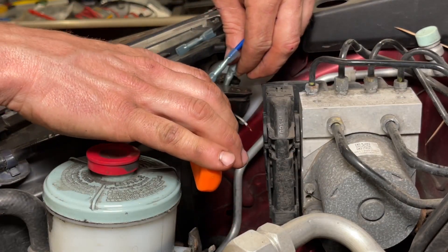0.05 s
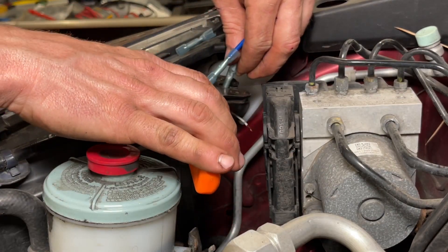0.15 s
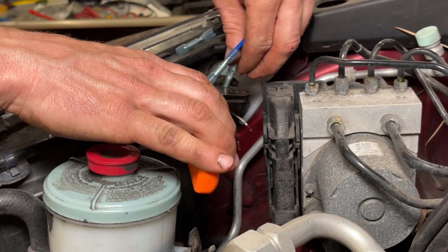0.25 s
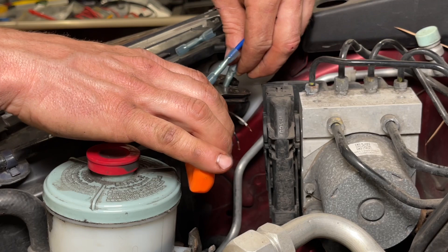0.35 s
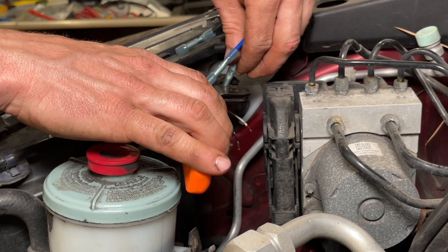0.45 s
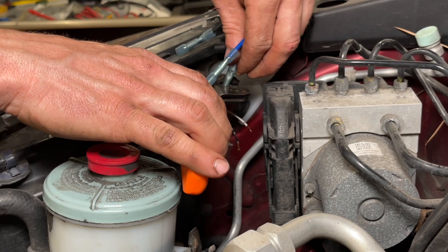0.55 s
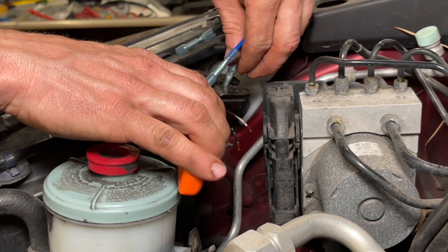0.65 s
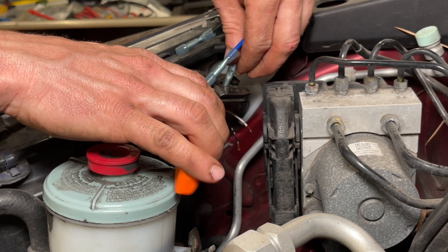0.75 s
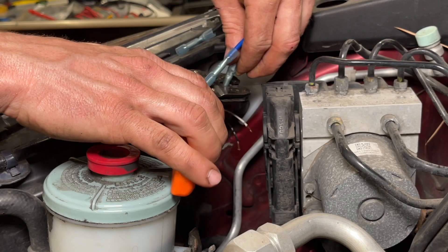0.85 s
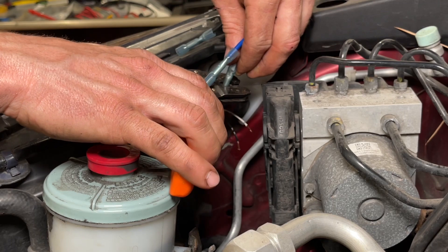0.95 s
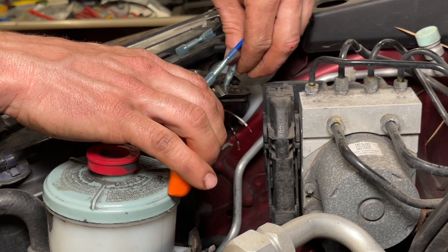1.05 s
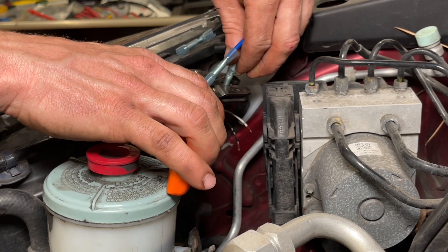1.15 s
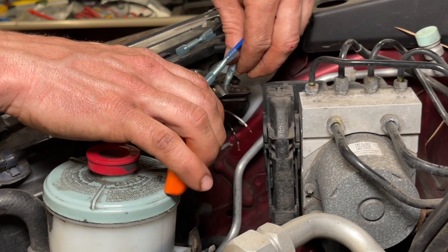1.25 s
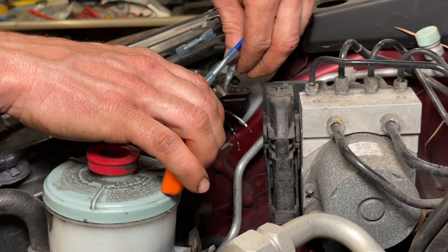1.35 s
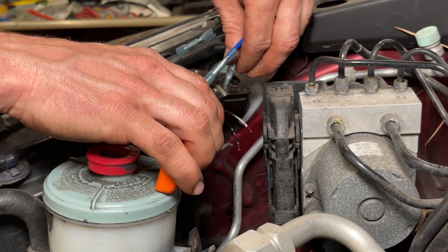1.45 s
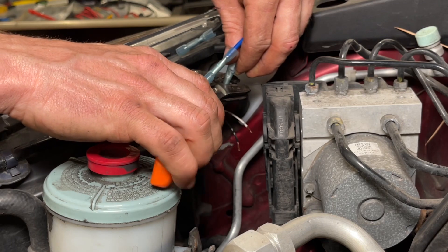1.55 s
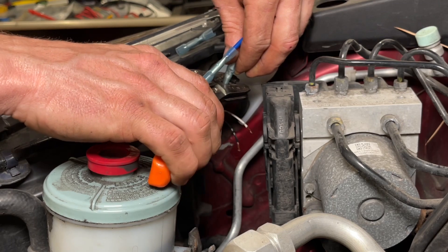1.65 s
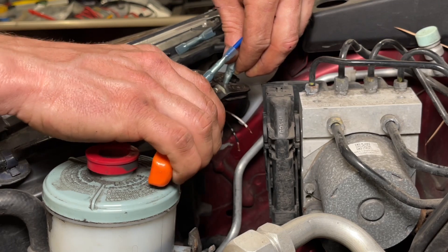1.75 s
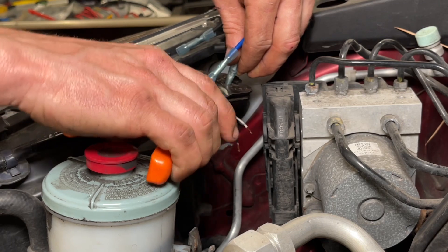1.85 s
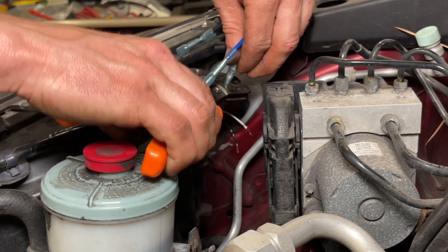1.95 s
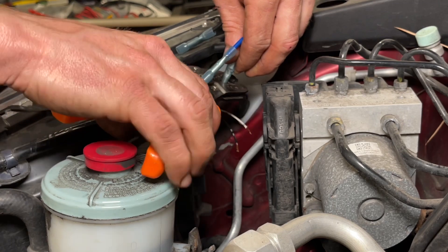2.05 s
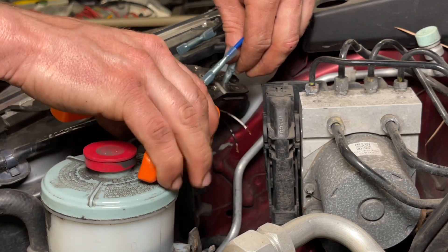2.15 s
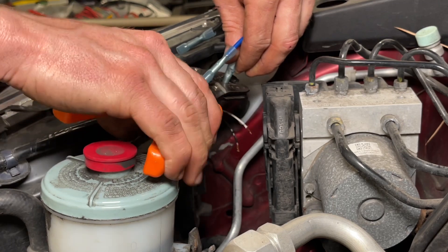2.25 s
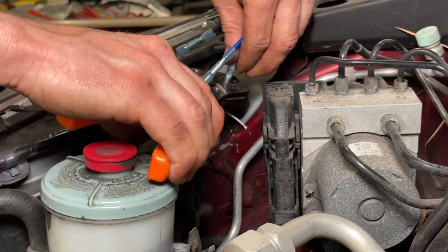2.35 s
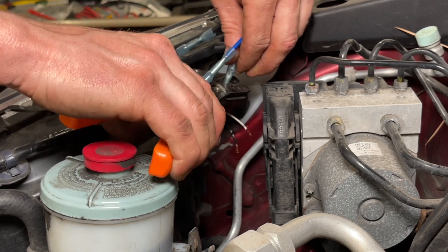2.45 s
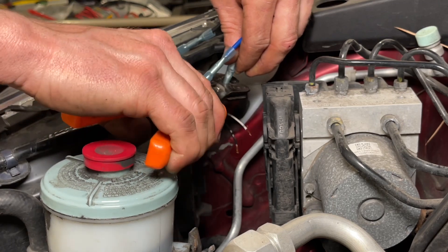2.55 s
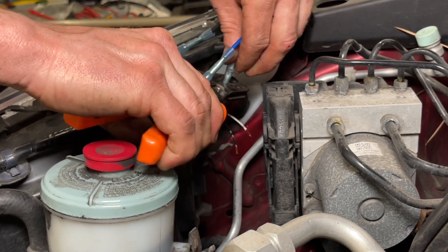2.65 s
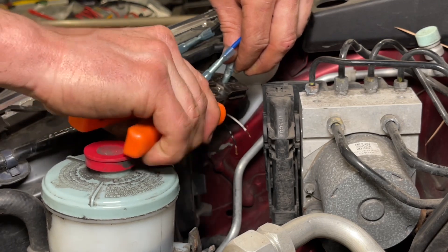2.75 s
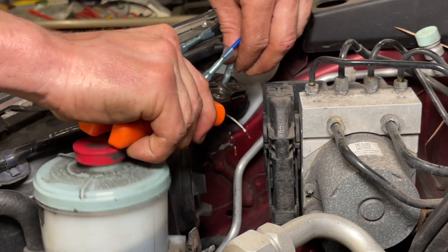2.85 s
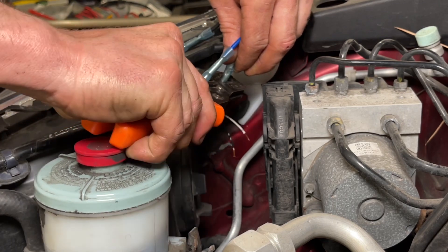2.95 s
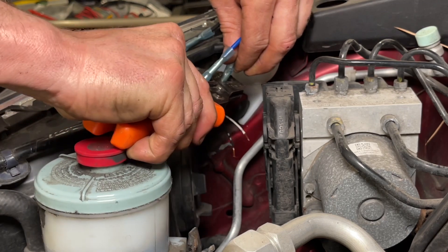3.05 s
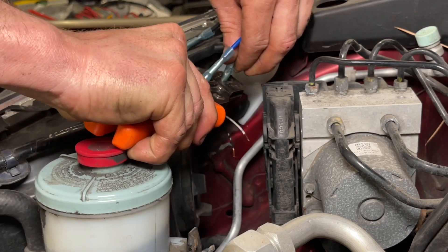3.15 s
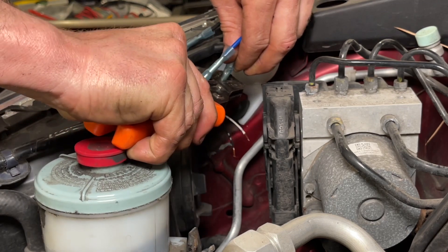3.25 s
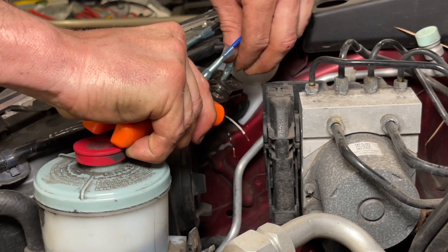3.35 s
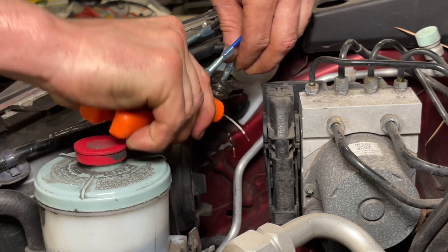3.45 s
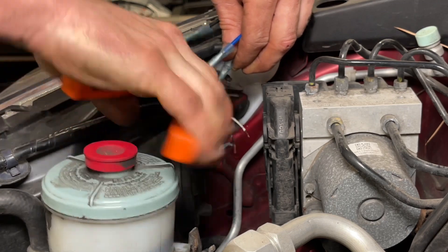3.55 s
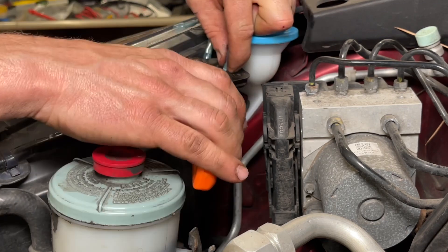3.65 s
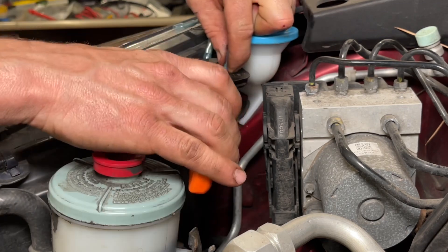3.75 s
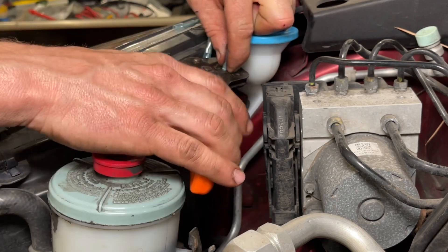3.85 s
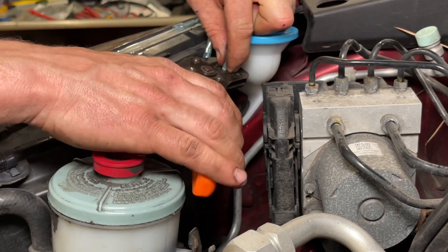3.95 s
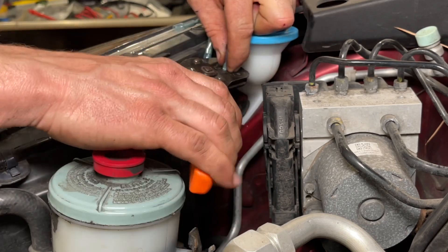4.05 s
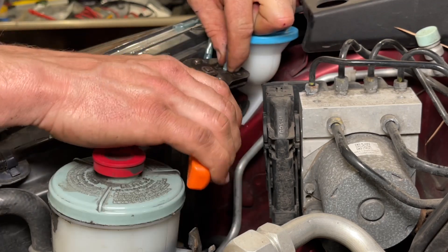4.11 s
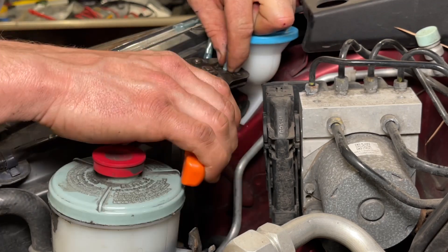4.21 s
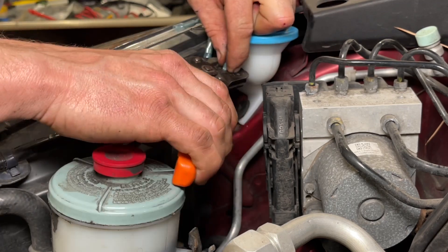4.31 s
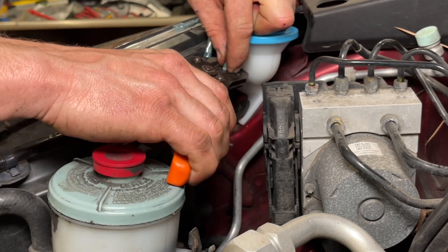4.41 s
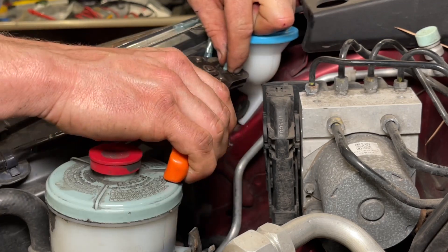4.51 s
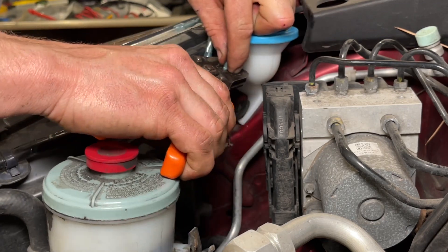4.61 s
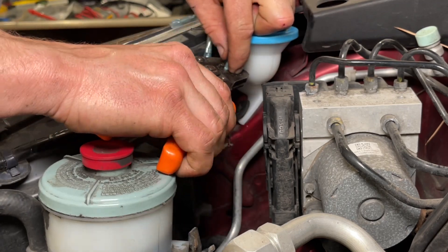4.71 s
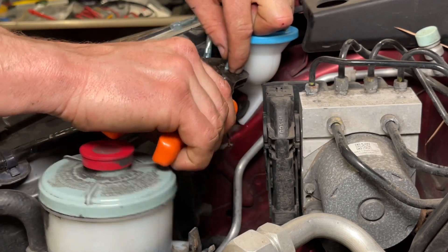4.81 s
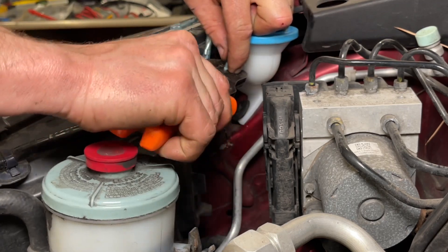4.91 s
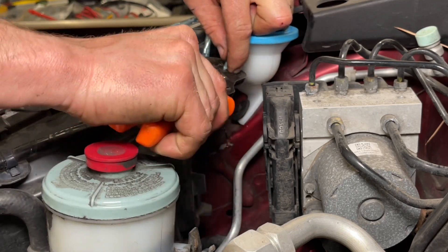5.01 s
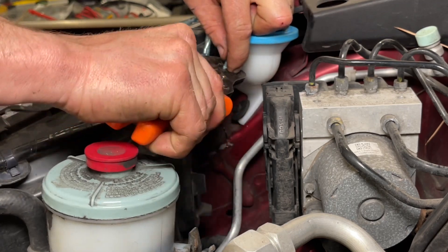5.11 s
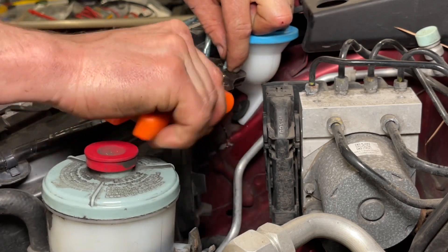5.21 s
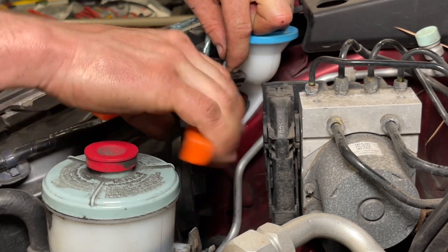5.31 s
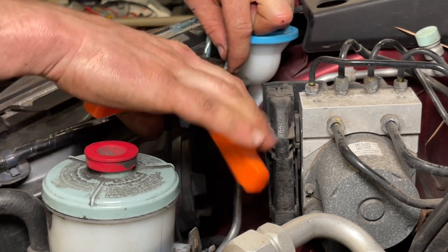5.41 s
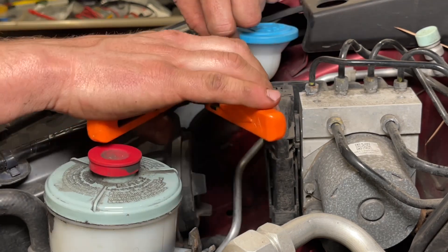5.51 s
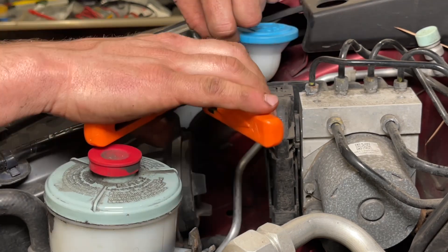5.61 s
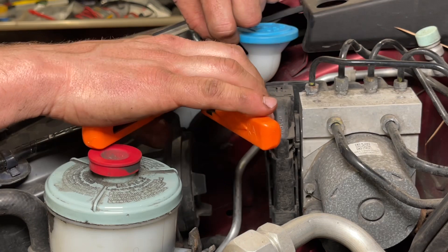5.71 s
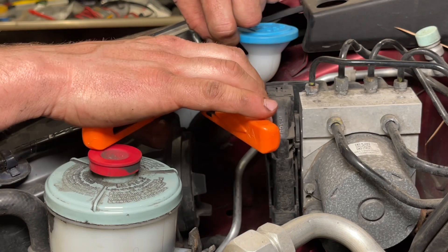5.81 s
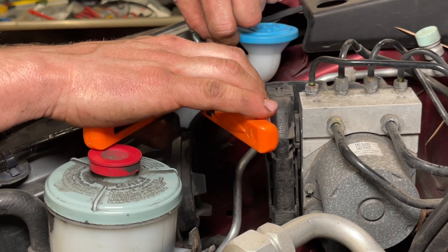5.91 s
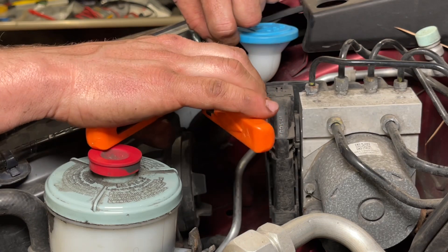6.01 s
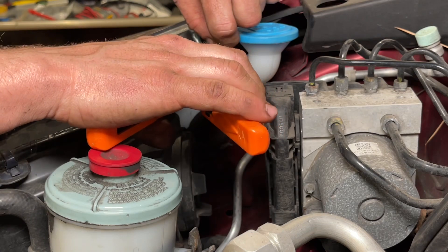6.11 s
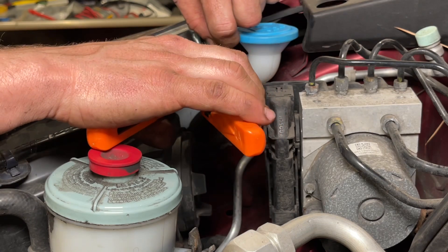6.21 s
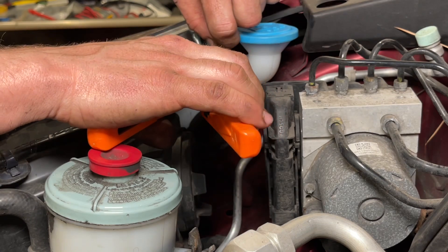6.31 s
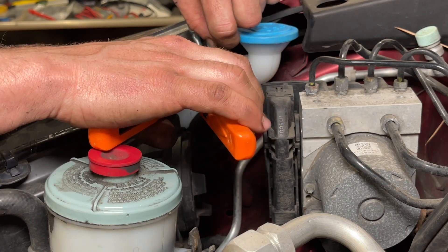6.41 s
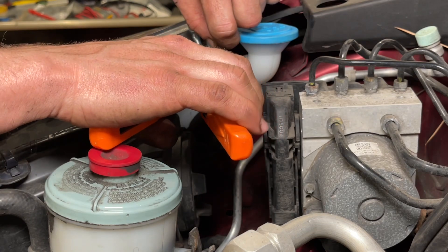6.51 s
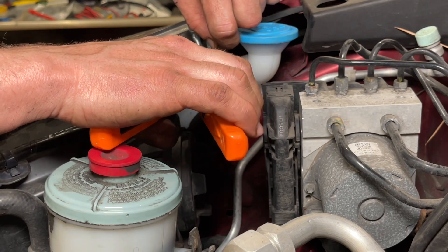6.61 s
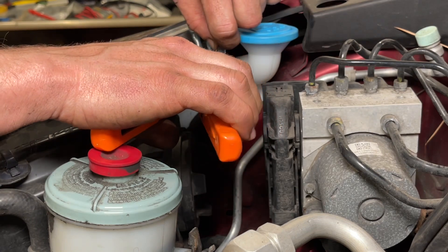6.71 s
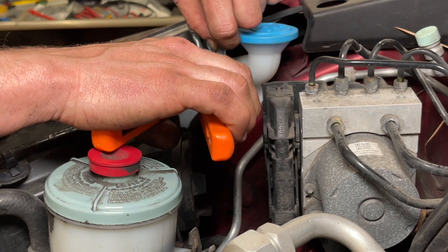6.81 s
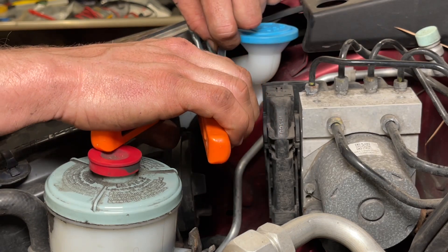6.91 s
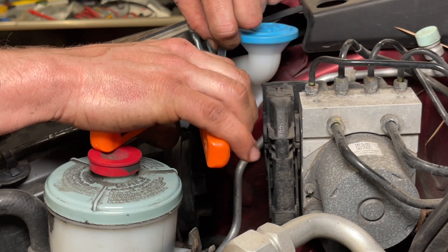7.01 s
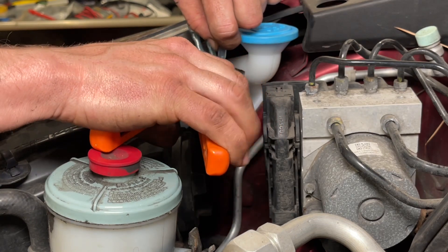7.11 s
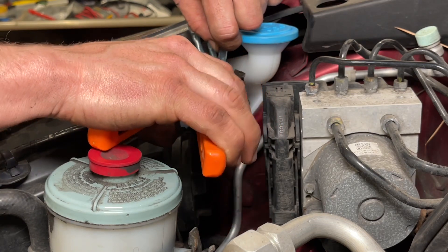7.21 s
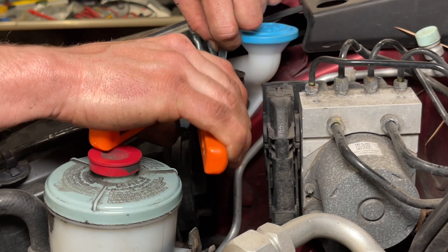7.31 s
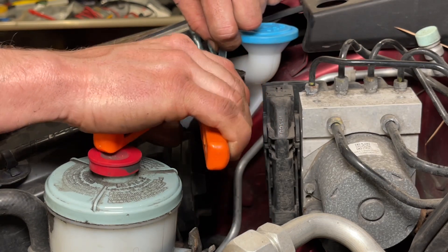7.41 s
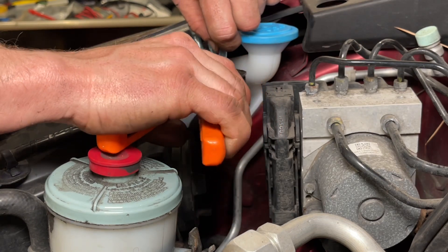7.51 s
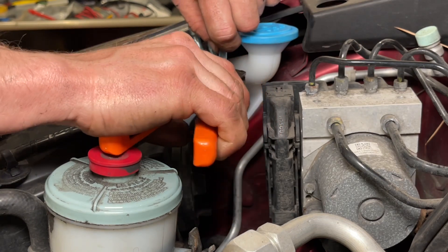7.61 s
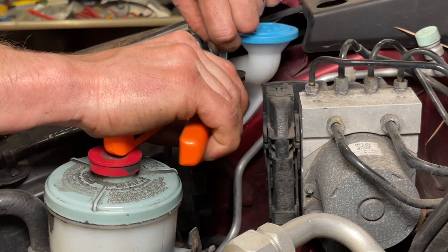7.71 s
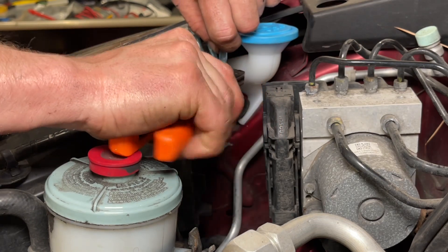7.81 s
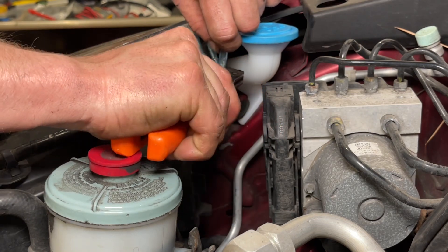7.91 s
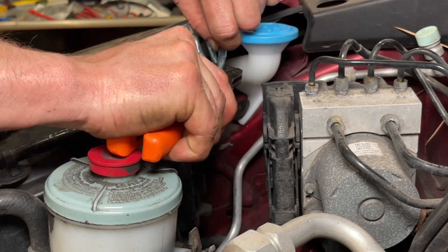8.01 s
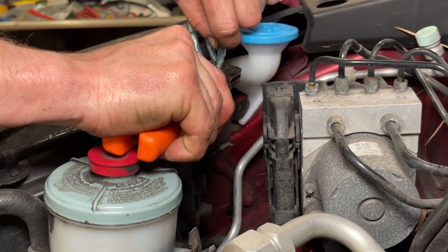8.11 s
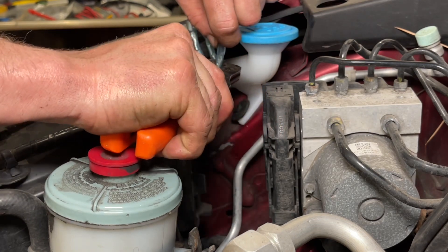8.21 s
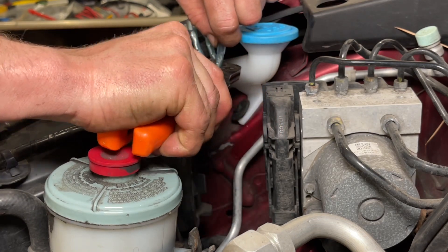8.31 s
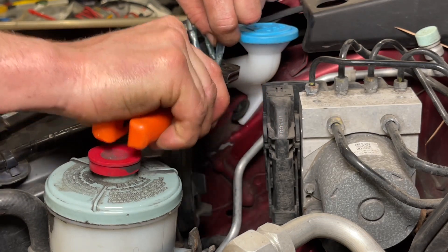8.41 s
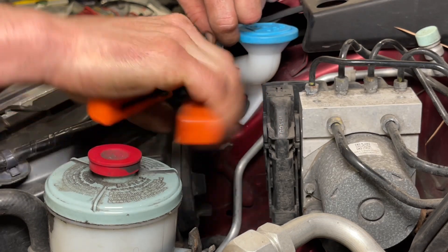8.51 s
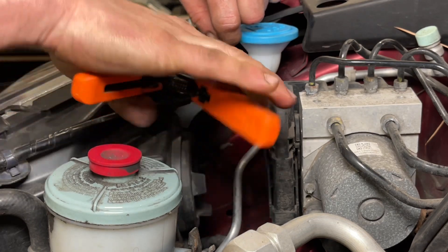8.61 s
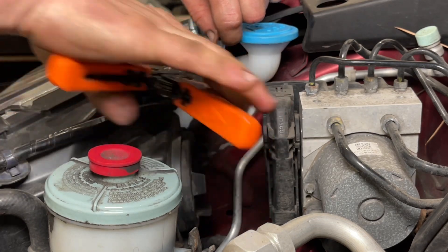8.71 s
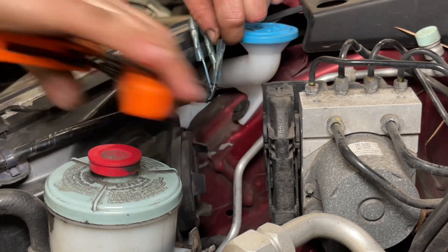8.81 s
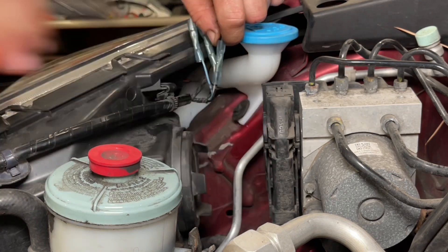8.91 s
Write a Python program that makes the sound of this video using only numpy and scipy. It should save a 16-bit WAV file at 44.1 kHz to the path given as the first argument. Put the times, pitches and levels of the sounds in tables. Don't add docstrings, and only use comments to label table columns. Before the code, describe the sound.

Three squeezes of a steel ratchet crimper, heard close and dry with a short engine bay echo and a faint garage tail. Crisp uneven clicks lead to a firm bite, then teeth purr back in a quick clatter. Small ticks, dull handle rubbing, plastic tank thumps and a tiny spring squeak fill in. Far traffic rumbles softly, cutting out momentarily at two scene changes; a barely audible brake squeal comes late.

```python
import sys
import numpy as np
from scipy import signal
from scipy.fft import rfft, irfft, next_fast_len
from scipy.io import wavfile
from scipy.ndimage import uniform_filter1d, map_coordinates

SR = 44100
rng = np.random.default_rng(int(sys.argv[2]) if len(sys.argv) > 2 else 0)


def field_ratio(decibels):
    return 10 ** (np.asarray(decibels, dtype=float) / 20)


def master_out(mix):
    frames = np.transpose(np.atleast_2d(mix))
    ceiling = np.clip(frames, -1, 1)
    pcm = np.round(ceiling * 32767).astype(np.int16)
    wavfile.write(sys.argv[1], SR, pcm)


N = 395047
TIME = np.arange(N) / SR

# centre in Hz, width in Hz, level in dB.
PAWL_MODES = [(4600, 520, -7.5), (5993, 1400, -4), (7400, 900, -2.5), (8713, 700, -1.5)]
PAWL_TIP_MODES = [(9300, 1500, -2), (10400, 1000, 3), (12300, 900, -8.5)]
FRAME_MODES = [(1600, 370, -8.5), (2030, 280, -1.5), (2684, 814, -2.5), (3600, 1400, -2), (4500, 500, -1)]
JAW_MODES = [(1700, 350, -4), (1208, 200, 1.5), (1220, 25, 4.5)]
# start in seconds, level in dB, pitch in
# Hz, 60 dB decay in seconds.
PANELS = [(2.487, -52.5, 2740, 0.23), (2.53, -59.5, 2720, .3), (2.61, -49, 2720, 0.2),
          (2.826, -49, 1223, 0.44), (4.881, -47.5, 1222, 0.53), (2.826, -61, 4530, 0.48),
          (4.893, -61, 4600, .5), (6.814, -55.5, 4284, 0.4), (7.213, -57.5, 1220, .35),
          (1.6028, -17, 2900, 0.02), (1.606, -24, 3080, .022), (1.407, -68, 6520, .3),
          (1.407, -70, 6200, .2), (1.407, -71, 5850, .2), (1.407, -66, 8200, .12), (1.407, -66, 3100, .1),
          (1.407, -70, 4000, .12), (1.903, -66, 5500, .016), (1.943, -66, 5600, .018),
          (1.953, -69, 4200, .03), (1.823, -63, 4600, .016), (7.596, -33, 1620, .022),
          (7.679, -35, 1700, .022), (7.729, -34, 1680, .022), (7.811, -33, 1700, .022),
          (6.814, -26, 4230, .025), (1.604, -48, 8000, .2), (6.814, -52, 3327, .15), (6.814, -59, 4130, .5),
          (6.814, -58, 4400, .3), (6.814, -56, 8540, .25), (6.814, -60, 8060, .4), (6.814, -60, 7560, .35),
          (1.604, -50, 3332, .14), (1.604, -60, 4124, .5), (1.604, -57, 6320, .25), (7.86, -60, 4377, .35),
          (7.86, -63, 4151, .42), (2.695, -56, 4600, .25), (4.893, -62, 4727, .8), (7.86, -55, 1220, 0.43)]


def crimper():
    s, db, frame_db, jaw_db, t60, link_hz, rise = contacts()
    dragged = rise > rise.min()
    heavy = (frame_db > -9.9) & ~dragged
    pawl_db = db - 7 + 2.5 * (dragged + 1.6 * heavy)
    tip_db = db - 5 - 3 * (dragged | heavy)
    edge_db = db - 9.5 + 6.5 * dragged - 6 * heavy
    pawl = steel(PAWL_MODES, s, pawl_db, t60, rise, bay_db=-21.5, garage_db=-32.5, garage_t60=0.5)
    tip = steel(PAWL_TIP_MODES, s, tip_db, 1.1 * t60, rise, bay_db=-22.5, garage_db=-31.5, garage_t60=0.3)
    edge = filtered(strokes(s, edge_db, 0.013, rise) * rng.standard_normal(N), body([(15000, 2900, 0)]))
    frame = steel(FRAME_MODES, s, db + frame_db + 0.5, t60, rise, bay_db=-14, garage_db=-30, garage_t60=0.52)
    jaw = steel(JAW_MODES, s, db + jaw_db - 8, 0.6 * t60, rise, bay_db=-6, garage_db=-25, garage_t60=0.52)
    rings = ring(s, db + jaw_db + 6.5, 1175, 0.029, beat=0) + plates(s, db - 26)
    for offset_db, detune in [(1.2, 0), (-3, 0.09)]:
        hz = link_hz * (1 + detune * rng.uniform(-1, 1, len(s)))
        rings = rings + ring(s + 0.0006, db + frame_db + offset_db, hz, 0.021, beat=0)
    small = filtered(pawl + tip + frame, lambda hz: (1j * hz / (1j * hz + 1100)) ** 2)
    panels = ring(*np.transpose(PANELS), beat=0.45)
    return small + edge + jaw + rings + panels


# start in seconds, peak in dB, frame in dB re pawl, ringing link in Hz.
TEETH = [(1.5781, -25.5, -19, 2920), (2.4848, -12, -17, 2830), (2.5283, -17.5, -18, 4070),
         (2.608, -7, -19, 2830), (2.6872, -18.5, -21, 4600), (2.6936, -10, -17.5, 4440),
         (2.7373, -8.5, -17.5, 4530), (4.2705, -10, -21.5, 4640), (4.3257, -19.5, -20.5, 4660),
         (4.4618, -10, -17, 3970), (4.5149, -20, -19.5, 4000), (4.6304, -12, -17, 4880),
         (4.7281, -13, -16.5, 4900), (7.4714, -12, -19, 3110), (7.5305, -15.5, -19, 4800),
         (7.5949, -9, -20, 4500), (7.624, -17.5, -17, 4650), (7.6783, -12, -15, 4600),
         (7.7286, -12, -16, 4480)]
# start in seconds, peak in
# dB, frame in dB re pawl, jaw in dB re pawl, ringing link in Hz.
BITES = [(1.6018, -9.5, -20, -43, 3100), (2.8197, -21, -5, -26, 2700), (2.8236, -20.5, -4, -3, 2830),
         (2.8359, -41.5, 9, -8, 4690), (2.8492, -32.5, 3, -29, 2810), (4.867, -21.5, -13, -26, 2580),
         (4.8771, -16.5, -4, -3, 2850), (4.8919, -13.5, -6.5, -32, 4500), (4.9104, -29, -7.5, -15, 3520),
         (6.8008, -37, -11, -35.5, 4360), (6.8125, -13.5, -14, -43, 4250), (7.211, -37, 3.5, 2.5, 3050),
         (7.6144, -28.5, -2, -26, 4680), (7.8109, -21.5, -9.5, -36, 3685), (7.8274, -53, 6, -21, 3460),
         (7.832, -34.5, -3, -31, 2450), (7.8409, -30, -3, -16, 3090), (7.8579, -27, 0, -4.5, 3700)]
# start in seconds, peak in dB, frame in dB re pawl, jaw in dB re pawl.
TICKS = [(0.9038, -77, 10, 15), (1.4058, -40.5, -17, -40), (1.8217, -60, -8, -30), (1.905, -77.5, 0, -10),
         (1.9447, -70, -6, -15), (2.0501, -56, -17, -17.5), (2.1811, -60, -5, -4.5),
         (2.2593, -53.5, -7.5, -30), (2.2727, -43.5, -10, -37.5), (2.433, -67.5, 5, -10),
         (4.2396, -65, 1, -16), (4.257, -54, -17, -50), (4.6742, -42, -21.5, -8), (6.3294, -76, 0, 5.5),
         (6.559, -41.5, -6.5, -36), (6.7243, -67, -3, -9.5), (7.1194, -64, -8, -11), (7.4465, -69.5, 10, 5)]
# start in seconds, peak in dB, frame in dB re pawl, ringing link in Hz.
RATTLE = [(3.4484, -54, -10, 2437), (3.4996, -51.5, -2.5, 3220), (3.5232, -36, -12, 2690),
          (3.5395, -33, -3.5, 2850), (3.549, -19, -16, 5300), (3.5518, -13, -10, 2780),
          (3.559, -13, -12, 2830), (3.5658, -11, -10, 2700), (3.5738, -11, -9, 2800),
          (3.5778, -19, -12, 2800), (3.5837, -9, -13, 3070), (3.5915, -22, -12, 3000),
          (3.6098, -33, 0, 3080), (5.2828, -40, -8, 4060), (5.3022, -36, -14, 3040), (5.3075, -46, 6, 3000),
          (5.3172, -22, -14, 3636), (5.3205, -9, -13, 3200), (5.3312, -8.5, -13, 3450),
          (5.3482, -8, -14, 3243), (5.3735, -10, -16.5, 3210), (5.3975, -9, -16, 3000),
          (5.4115, -24, -9, 4376), (5.4272, -16, -5, 3510), (5.4335, -26, -5, 3700),
          (8.4854, -47, -6.5, 3370), (8.5055, -33, -13.5, 5500), (8.5275, -20, -13, 2750),
          (8.5303, -12, -11, 2750), (8.5358, -14, -16, 4180), (8.541, -12, -16, 2780),
          (8.5482, -12, -11, 2650), (8.5555, -11, -13, 4200), (8.5612, -18, -13, 4200),
          (8.5755, -14, -11, 4520), (8.5878, -22, -24, 4260), (8.81, -59.5, -3, 2860)]


def contacts():
    rows = []
    for s, db, frame, hz in TEETH:
        t60 = 0.027 + 0.0007 * db
        rows.append((s, db, frame, -44.5, t60, hz, 0.0008))
    for s, db, frame, jaw, hz in BITES:
        rows.append((s, db, frame, jaw, 0.026, hz, 0.0008))
    for s, db, frame, jaw in TICKS:
        rows.append((s, db, frame, jaw, 0.022, 3000, 0.0008))
    for s, db, frame, hz in RATTLE:
        jaw = -44.5 - 0.4 * db
        rows.append((s - 0.0012, db - 2.5, frame + 1.5, jaw, 0.02, hz, 0.001))
        if db > -18:
            rows.append((s - 0.004, db - 12, frame - 4, -44.5, 0.02, hz, 0.0016))
    return np.transpose(rows)


def steel(modes, times, levels_db, t60s, rises, bay_db, garage_db, garage_t60):
    spikes = unit(rng.standard_normal(N) * field_ratio(2.2 * wobble(2500)))
    chatter = strokes(times, levels_db, np.maximum(t60s, 0.008), rises) * spikes
    bay = strokes(times, levels_db + bay_db, 0.091, rises=0.002)
    garage = strokes(times, levels_db + garage_db, garage_t60, rises=0.016)
    blurred = [(hz, 1.2 * width, db) for hz, width, db in modes]
    diffuse = rush(body(blurred), [(1000, 0.6), (5000, 0.75), (9000, 0.96)], patchy_db=1.6)
    return filtered(chatter, body(modes)) + np.hypot(bay, garage) * diffuse


# centre in Hz, width in Hz, level in dB.
PLATE_MODES = [(2720, 14, -9), (3325, 22, -6), (4130, 10, -7), (4215, 11, -7), (4720, 9, -8), (5620, 8, -4),
               (6190, 9, -2), (6290, 10, -1), (6490, 11, -2), (6900, 9, -3), (7550, 8, -1), (7845, 9, -1),
               (8090, 8, -2), (8450, 10, 1)]


def plates(times, levels_db):
    blows = strokes(times, levels_db, 0.02, rises=0.001) * rng.standard_normal(N)
    take = np.searchsorted([cut for cut, *_ in SCENE_CHANGES], TIME)
    return sum((take == k) * filtered((take == k) * blows, body(PLATE_MODES)) for k in np.unique(take))


# start in seconds, peak in dB, pitch in Hz, 60 dB decay in seconds.
KNOCKS = [(2.157, -45.5, 241.5, 0.059), (2.79, -37.5, 527, 0.052), (2.824, -32.5, 587, 0.033),
          (2.853, -28.5, 440, 0.03), (2.869, -26.5, 326, 0.027), (2.829, -36, 140, .04),
          (2.879, -38, 420, .03), (2.905, -39, 600, 0.04), (2.927, -43, 450, .04), (2.962, -46, 270, .05),
          (5.24, -46, 900, .03), (5.308, -46, 800, .02), (3.536, -42, 181, 0.15), (4.675, -44, 170, 0.088),
          (4.85, -41, 176, 0.13), (4.878, -27, 700, 0.025), (7.211, -41, 700, 0.025),
          (4.462, -50, 330, 0.07), (4.908, -36, 300, 0.039), (5.246, -45, 165, 0.05),
          (5.254, -48, 210, 0.15), (5.306, -47, 360, 0.042), (7.616, -18.5, 500, 0.03),
          (7.628, -39, 554, 0.1), (7.897, -46, 500, .04), (8.655, -46, 450, .05),
          (7.828, -37.5, 529, 0.027), (7.843, -32, 480, 0.035), (7.857, -32, 276, 0.018),
          (8.551, -39, 364, 0.11), (8.598, -44, 170, 0.04), (8.699, -47, 194, 0.05)]


def tank():
    out, t = np.zeros(N + SR), np.arange(SR // 5) / SR
    for s, db, hz, t60 in KNOCKS:
        sag = 1 + 0.03 * np.exp(-t / 0.006)
        tone = np.sin(2 * np.pi * hz * np.cumsum(sag) / SR)
        tone = tone + 0.2 * np.sin(2 * np.pi * 1.55 * hz * t)
        fade = field_ratio(db + 2 - 60 * t / t60) * (1 - np.exp(-t / 0.0013))
        out[round(s * SR):][:len(t)] += fade * tone
    s, db = np.transpose(KNOCKS)[:2]
    boom = rush(body([(282, 430, -1.4), (525, 250, -0.63)]), [(300, 1.0)], patchy_db=-1)
    return out[:N] + strokes(s, db - 22.5, 0.33, rises=0.006) * boom


# start in seconds, hold in seconds, first level in dB, last level in dB.
RUSTLE = [(1.422, .07, -67, -92), (5.29, .025, -62, -60), (1.75, .3, -88, -88), (3.45, .03, -73, -79.5),
          (3.52, .002, -70.5, -71), (4.0, .22, -92, -87), (5.232, .04, -80, -84), (3.518, .03, -70, -64),
          (6.565, .08, -61, -95), (8.47, .01, -80, -76)]
# time in seconds, pitch in Hz, level in dB.
SPRING = [
    [(4.17, 3900, -94), (4.2, 3950, -83.5), (4.25, 4050, -84), (4.265, 4050, -99)],
    [(5.12, 7100, -90), (5.145, 7400, -80), (5.17, 8050, -82.5), (5.2, 8300, -94), (5.23, 8200, -78),
     (5.255, 7950, -72), (5.28, 8000, -80), (5.29, 8000, -98)],
]


def grip():
    level_db = gestures(RUSTLE, attack_s=0.02, release_s=0.02, quiet_db=-100)
    colour = body([(4000, 1200, -3.5), (6430, 1200, 0), (8300, 1200, -4)])
    out = field_ratio(level_db + 2.5 * wobble(55)) * rush(colour, [(5000, 1.0)], patchy_db=3.5)
    for s, hz, db in map(np.transpose, SPRING):
        pitch = np.interp(TIME, s, hz) + 50 * wobble(150)
        squeak_db = np.interp(TIME, s, db, left=-140, right=-140) + 3 * wobble(70)
        out = out + field_ratio(squeak_db) * np.sin(2 * np.pi * np.cumsum(pitch) / SR)
    return out


# start in seconds, hold in seconds, first level in dB, last level in dB.
HANDLING = [(2.86, .04, -54, -67), (2.91, .06, -68, -71), (3.52, .07, -60, -60.5), (4.48, .15, -67, -70),
            (4.68, .002, -61, -64), (4.855, .1, -55, -64), (5.25, .04, -57, -67.5), (5.33, .12, -61, -68.5),
            (8.56, .06, -56, -64.5), (8.64, .08, -62, -74), (8.8, .14, -72, -70)]


def palm():
    level_db = gestures(HANDLING, attack_s=0.035, release_s=0.045, quiet_db=-100)
    colour = body([(450, 300, 0), (770, 180, 1), (1200, 500, -3)])
    return field_ratio(level_db + 3.3 * wobble(70)) * rush(colour, [(500, 1.0)], patchy_db=2.5)


# time in seconds, rumble level in dB.
HUM = [(0, -54), (1.3, -54.5), (1.55, -57), (2.2, -53.5), (3.2, -54.5), (5.3, -55), (5.9, -50),
       (6.4, -51.5), (7.1, -54), (7.7, -51.5), (8.3, -53.5), (8.96, -52.5)]
# frequency in Hz, density in dB per Hz.
RUMBLE = [(12, -46.5), (20, -31), (32, -16), (54, 2.5), (70, 2), (134, -4), (162, -4.5), (201, -11.5),
          (353, -23.5), (400, -29), (520, -66.5), (880, -120)]
ROAD = [(150, -30.5), (250, -4), (354, -1.5), (393, -7), (519, -4), (770, -15), (835, -11), (949, -14.5),
        (4000, -38.5), (5200, -64), (8800, -120)]
AIR = [(1500, -30), (2400, -5), (3100, -2), (3500, -7), (4300, -7.5), (9500, -7), (10400, -14),
       (11400, -11), (12300, -12), (13500, -60)]
# start in seconds, hold in seconds, first level in dB, last level in dB.
SQUEAL = [
    (5.98, .06, -81.5, -82.5),
    (6.32, .34, -81, -81.5),
    (6.7, .22, -80, -83),
]
# frequency in Hz, left-right likeness from -1 to 1.
ALIKE = [(60, 0.97), (150, 0.97), (380, 0.55), (950, 0.29), (2380, 0.81), (5980, 1), (15000, -0.32)]
# frequency in Hz, left minus right in dB.
LEAN = [(60, -2.5), (300, -3), (1300, 0.5), (4000, -1)]


def traffic():
    rumble_db = np.interp(TIME, *np.transpose(HUM))
    swell_db = rumble_db - rumble_db.mean()
    road_db, air_db = -66.3 + 0.1 * swell_db, -87.5 + 0.1 * swell_db
    rumble = rush(lambda hz: field_ratio(along(RUMBLE, hz)), ALIKE, patchy_db=1.0)
    road = rush(lambda hz: field_ratio(along(ROAD, hz)), ALIKE, patchy_db=2.0)
    air = rush(lambda hz: field_ratio(along(AIR, hz)), ALIKE, patchy_db=0.3)
    out = field_ratio(rumble_db + 0.4 * wobble(3)) * rumble
    out = out + field_ratio(road_db + 0.8 * wobble(3.9)) * road + field_ratio(air_db) * air
    squeal_db = gestures(SQUEAL, attack_s=0.07, release_s=0.07, quiet_db=-96)
    turn = 2 * np.pi * np.cumsum(1505 + 18 * wobble(25)) / SR
    squeal = field_ratio(squeal_db + 4.6 * wobble(26)) * (np.sin(turn) + 0.12 * np.sin(2 * turn))
    return filtered(out + squeal, lambda hz: field_ratio(along(LEAN, hz) * [[0.5], [-0.5]]))


def strokes(times, levels_db, t60s, rises):
    power = np.zeros(N + SR)
    for s, db, t60, rise in np.broadcast(times, levels_db, t60s, rises):
        t = TIME[:int(SR * min(1.4 * t60, 0.75))]
        decay = field_ratio(2 * db) * np.exp(-np.log(1e6) * t / t60)
        onset = np.expm1(-(t / rise) ** 2) ** 2
        power[round(s * SR):][:len(t)] += decay * onset * until_change(s, t)
    return np.sqrt(power[:N])


def ring(times, levels_db, hzs, t60s, beat):
    out, t = np.zeros(N + SR), TIME[:SR // 3]
    for s, db, hz, t60 in np.broadcast(times, levels_db, hzs, t60s):
        fade = field_ratio(db - 60 * t / t60) * (1 - np.exp(-t / 0.002)) * until_change(s, t)
        blur = beat * hz / 1e5 * 2.4 * np.cumsum(rng.standard_normal(len(t)))
        twin = 1 + beat * np.sin(2 * np.pi * rng.uniform(15, 40) * t)
        out[round(s * SR):][:len(t)] += fade * twin * np.sin(2 * np.pi * hz * t + blur)
    return out[:N]


# time in seconds, fade out in seconds, fade in in seconds.
SCENE_CHANGES = [
    (3.624, .022, .03),
    (5.551, .04, .04),
]


def until_change(s, t):
    return t < min([cut - s for cut, *_ in SCENE_CHANGES if cut > s] + [1])


def gestures(rows, attack_s, release_s, quiet_db):
    levels = []
    for s, hold, first, last in rows:
        times = [s - attack_s, s, s + hold, s + hold + release_s]
        levels.append(np.interp(TIME, times, [quiet_db, first, last, quiet_db], left=-120, right=-120))
    return np.max(levels, axis=0)


def rush(colour, alike, patchy_db):
    z = signal.stft(rng.standard_normal((2, N)), nperseg=512)[2]
    field = uniform_filter1d(rng.standard_normal(z.shape[1:]), size=5, axis=0)
    field = uniform_filter1d(field, size=8, axis=1)
    pair = signal.istft(z * field_ratio(patchy_db * unit(field)), nperseg=512)[1][:, :N]

    def mid_side(hz):
        turn = np.arccos(np.clip(along(alike, hz), -1, 1)) / 2
        return colour(hz) * [np.cos(turn), np.sin(turn)]

    mid, side = filtered(pair, mid_side)
    return unit(np.array([mid + side, mid - side]))


def body(modes):
    def response(f):
        shape = 0
        for k, (centre, width, db) in enumerate(modes):
            damping = 1j * f * width
            shape = shape + (-1) ** k * field_ratio(db) * damping / (centre * centre - f * f + damping)
        return shape / np.sqrt(np.mean(abs(shape) ** 2))
    return response


def wobble(rate):
    return map_coordinates(rng.standard_normal(int(N * rate / SR) + 4), [TIME * rate])


def unit(x):
    return x / np.sqrt(np.mean(x ** 2) + 1e-20)


def along(points, hz):
    f, v = np.transpose(points)
    return np.interp(np.log(hz + 1), np.log(f + 1), v)


def filtered(x, response):
    m = 2 * next_fast_len(N // 2 + SR // 4)
    return irfft(rfft(x, m) * response(np.fft.rfftfreq(m, 1 / SR)), m)[..., :N]


def causal(gain):
    cepstrum = irfft(np.log(gain))
    half = len(cepstrum) // 2
    return np.exp(rfft(np.r_[cepstrum[0], 2 * cepstrum[1:half], np.zeros(half)]))


def scene():
    return crimper() + tank() + grip() + palm() + traffic()


def band_limit(x):
    return signal.sosfilt(signal.butter(12, 17020, fs=SR, output="sos"), x)


# frequency in Hz, gain in dB.
CAPSULE = [(3000, 0), (9300, 0), (11000, 1.5), (12400, -6.5), (13800, -19), (14700, -18), (16200, -17),
           (16800, -50), (17000, -100)]
# frequency in Hz, left lead in radians.
LEAD = [(200, 0), (380, .4), (1290, .75), (2070, -.2), (3450, .7), (4800, .55), (6460, .2), (8100, .6),
        (8790, -.2), (9390, -1.7), (11500, -5.6), (12500, -7.6), (14000, -9.5), (15200, -12.4)]


def record(dry):
    def capsule(hz):
        lead = np.exp(1j * along(LEAD, hz) * [[0.5], [-0.5]])
        return causal(field_ratio(along(CAPSULE, hz))) * lead

    ports = filtered(dry, capsule)
    ports = ports / (1 + abs(ports / 0.5) ** 4) ** (1 / 4)
    for cut, fade_out, fade_in in SCENE_CHANGES:
        ports = ports * np.clip(np.maximum((cut - TIME) / fade_out, (TIME - cut) / fade_in), 0, 1)
    return band_limit(ports)


dry = scene()
out = record(dry)
master_out(out)
```